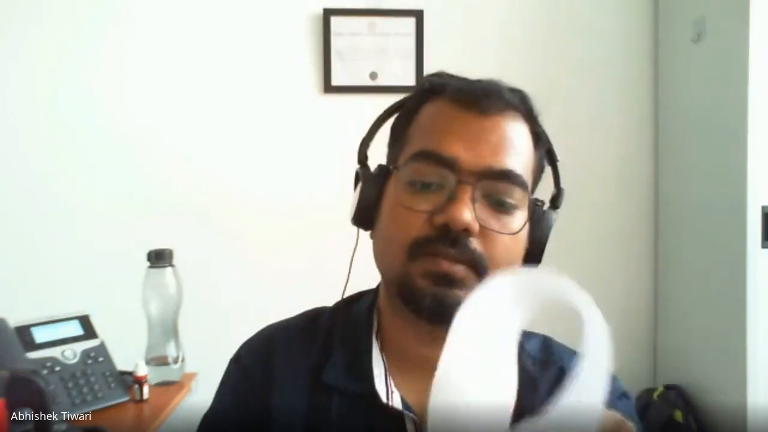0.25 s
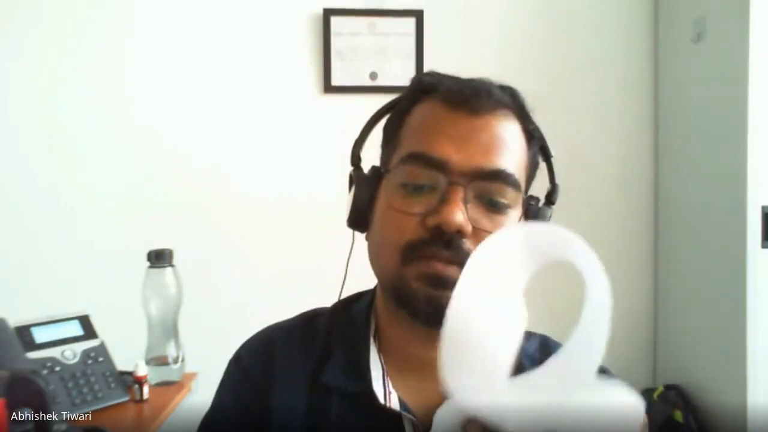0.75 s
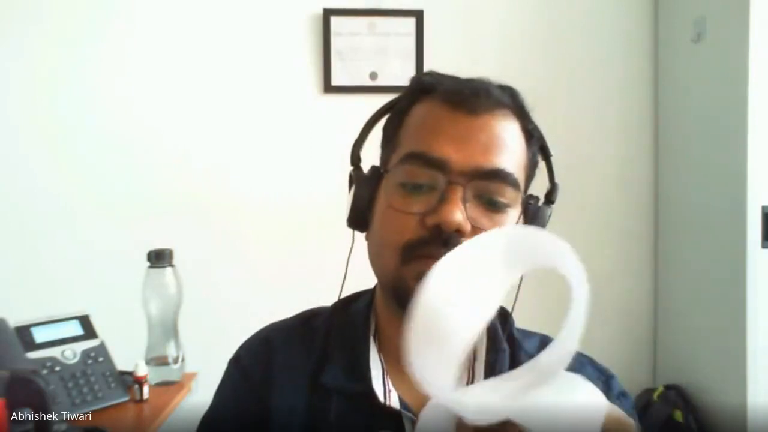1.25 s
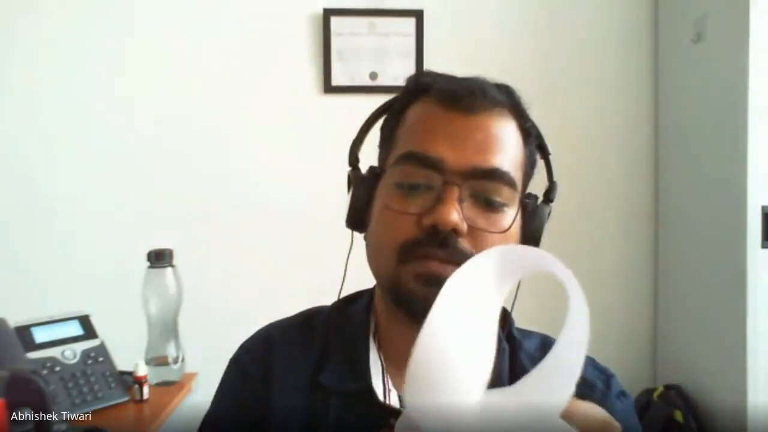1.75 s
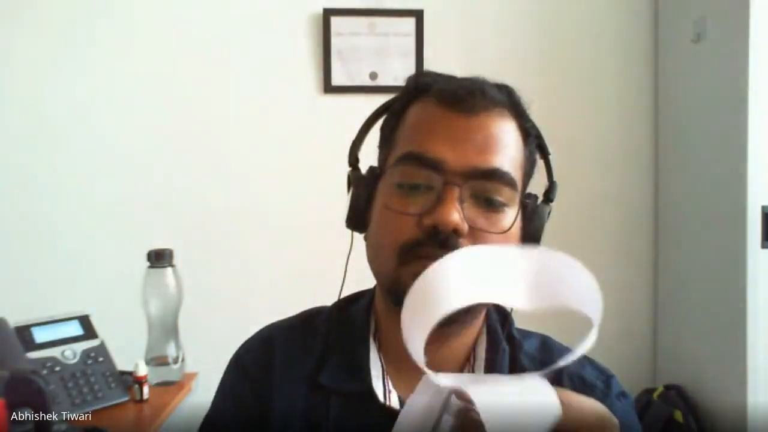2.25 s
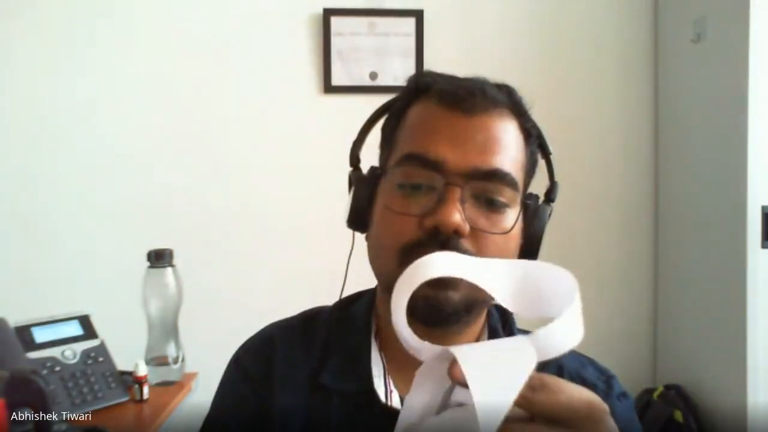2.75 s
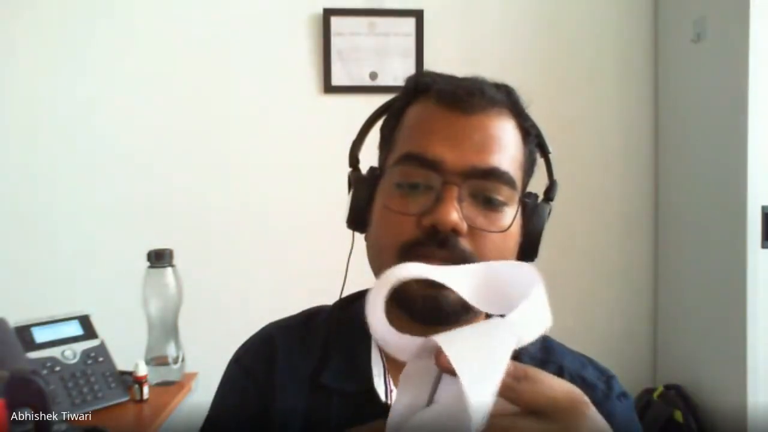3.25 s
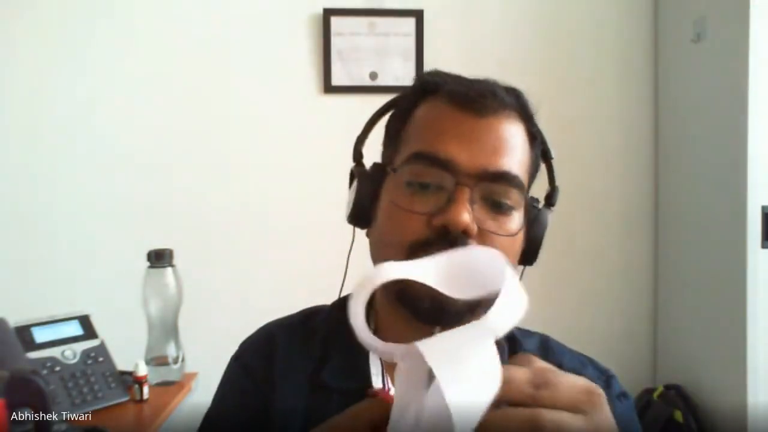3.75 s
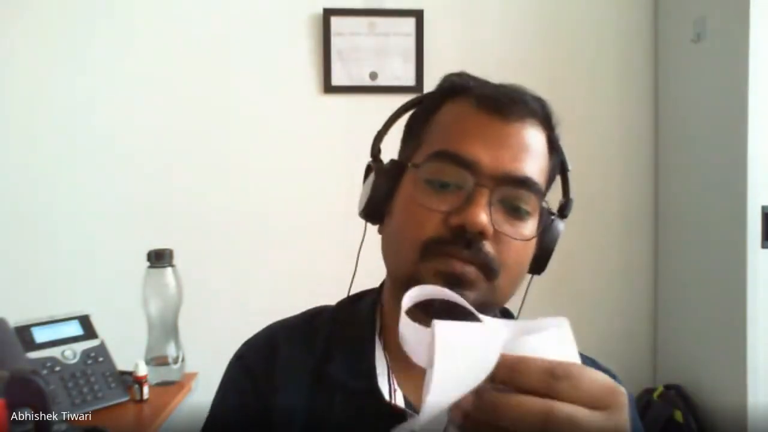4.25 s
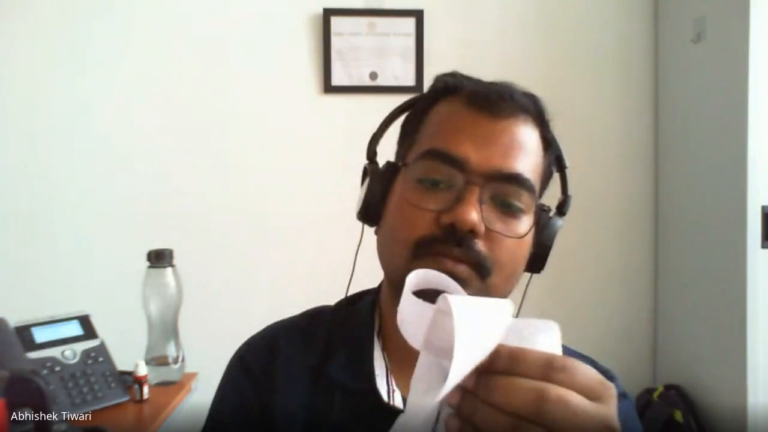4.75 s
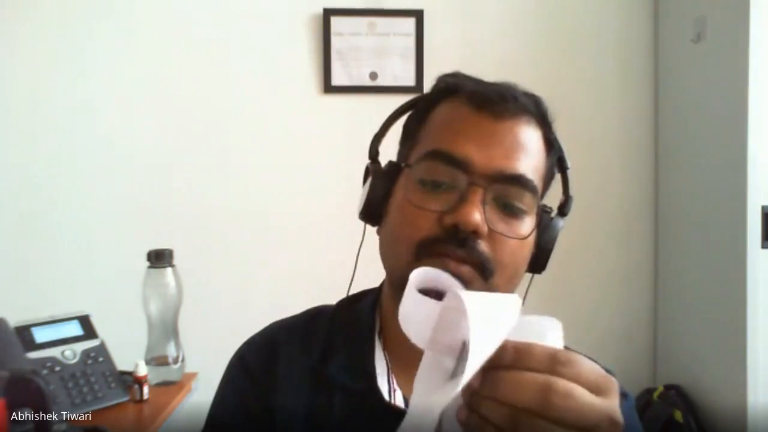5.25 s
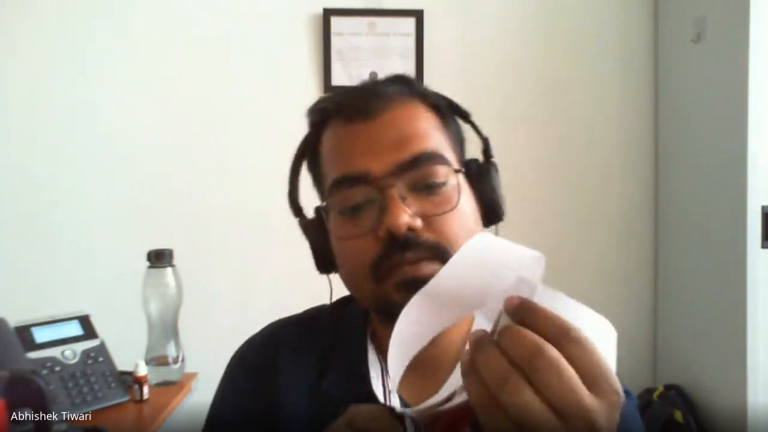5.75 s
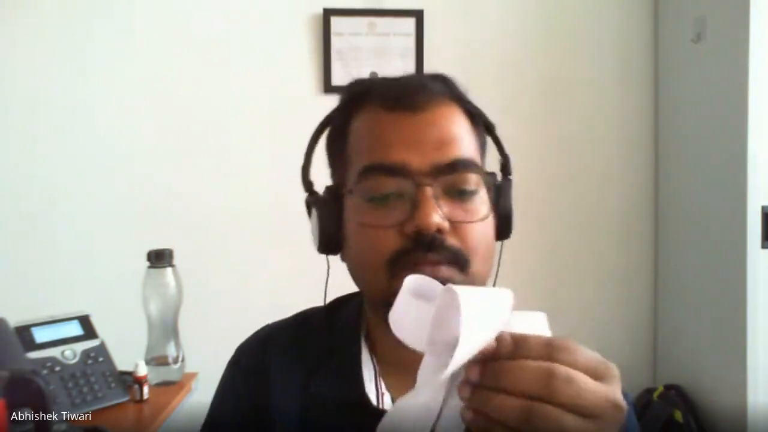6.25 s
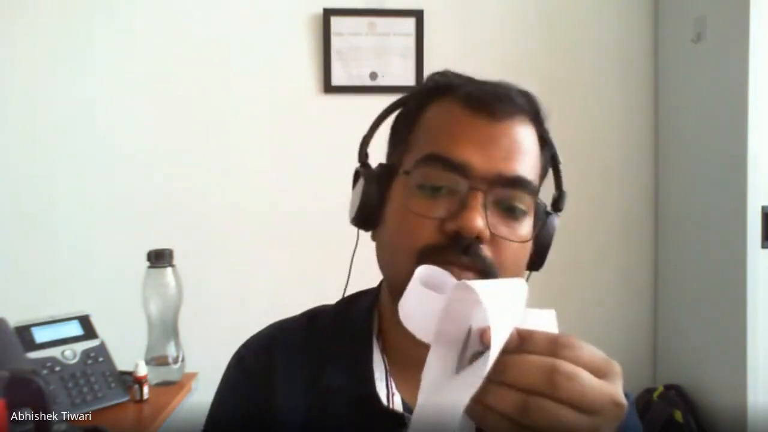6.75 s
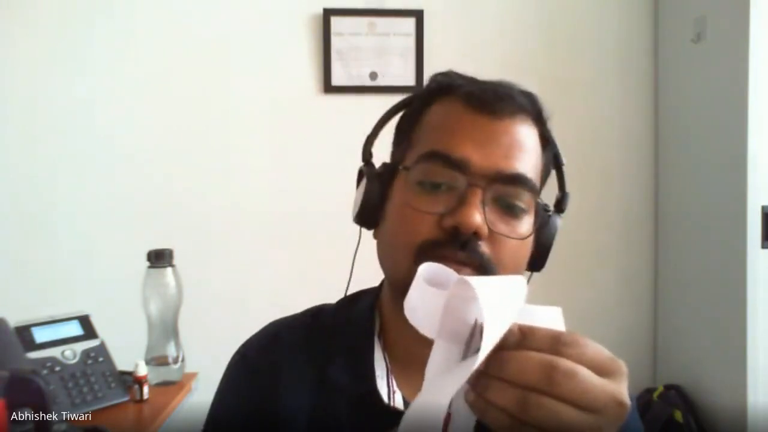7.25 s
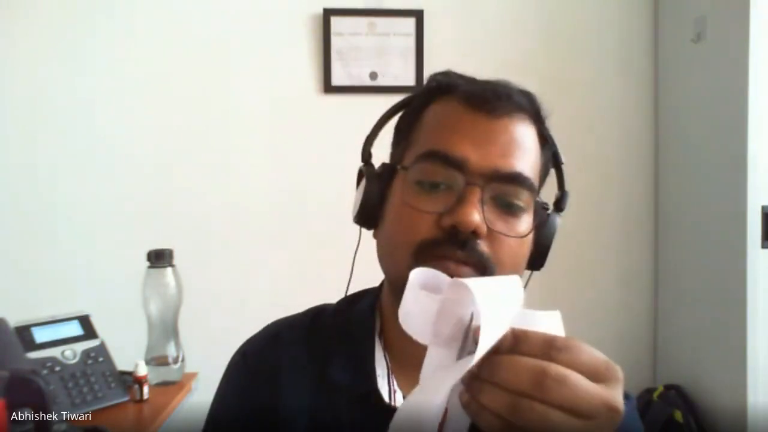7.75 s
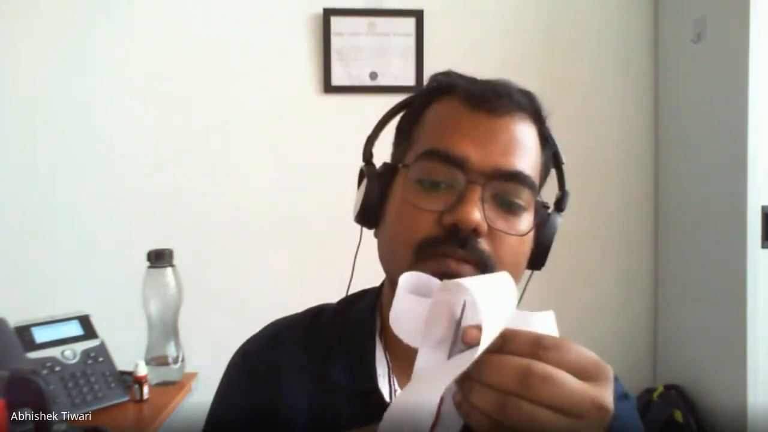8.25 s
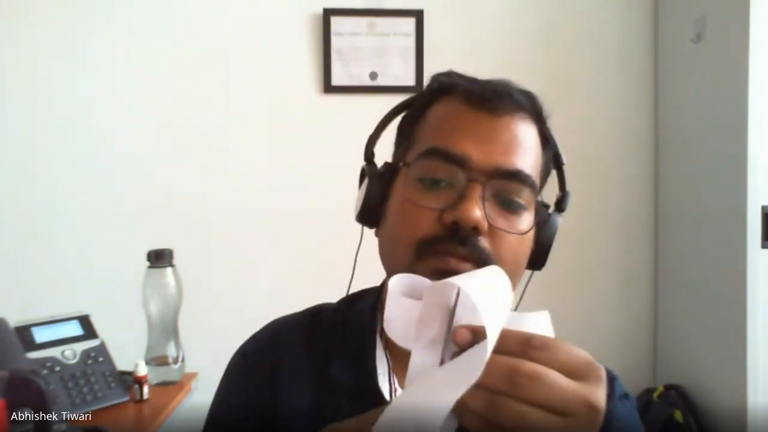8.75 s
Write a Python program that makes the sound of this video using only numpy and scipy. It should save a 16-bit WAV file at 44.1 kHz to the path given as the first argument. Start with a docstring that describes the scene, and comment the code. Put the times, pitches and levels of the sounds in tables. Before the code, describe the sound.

A small bare office, heard through a close computer microphone with faint room air, low rumble, a weak hum and hiss that shifts in steps. Paper brushes through fingers from 0 to 0.6 s. A small tick comes at 1.06 s, then a papery scrape around 1.3 s as the hiss swells until about 1.8 s. It is nearly quiet until a light rustle at 2.6 to 3 s. Crisp snips crack at 3.3 and 3.65 s with short rustles and a brief flutter. After a pause, the loudest cuts come at 5.1 to 5.45 s: sharp clustered snaps, a crunchy stroke and short room ring. Soft brushing follows at 5.6 s, light crackles at 6.3 s, a rustling stroke at 6.75 s and a clear snap at 7.07 s. From 7 s dull low handling thuds mix with faint paper brushing, growing more frequent from 8.2 s to the end.

```python
"""Paper brushes through the fingers at once, over room air with a faint hum and a hiss that changes in steps.
Then scissors work along a stiff paper loop in a small bare office, close to a computer microphone.
Strokes and snaps are fibre clicks, filtered by a paper colour with narrow ringing peaks and shaped in level.
The strip snaps, flutters and now and then sings; handling adds dull thuds of enveloped low noise.
Air, rumble and hiss are coloured noise; the hum is a wavering sine."""
import sys
import numpy as np
from scipy import signal
from scipy.fft import rfft, irfft, next_fast_len
from scipy.io import wavfile
from scipy.ndimage import uniform_filter1d

SR = 44100
rng = np.random.default_rng(int(sys.argv[2]) if len(sys.argv) > 2 else 0)


def store_wav(level_fs):
    """Save 16-bit WAV to argv[1]."""
    pcm = np.round(np.clip(np.atleast_2d(level_fs), -1, 1) * 32767)
    wavfile.write(sys.argv[1], SR, pcm.T.astype(np.int16))


N = 396459  # samples

# Levels of events and air are before the layer's gain_db; colours are relative spectral densities.
# hiss and fizz, held until the next row: t/s, hiss level/dB, fizz level/dB
HISS_STEPS = [(0, -78.5, -86), (.51, -65, -87.5), (1.38, -52.5, -79.5), (1.773, -74.5, -77),
              (2.622, -73.5, -72), (3.87, -69.5, -77), (4.29, -87, -76), (5.8, -82, -82),
              (7.402, -102, -80.5)]
# hiss colour: f/Hz, level/dB
HISS_COLOUR = [(100, -6), (1200, -7), (2600, -3.5), (3400, 3), (4000, 2.5), (4700, -2), (5600, 3),
               (7800, -2.5), (8600, -15.5), (9500, -47)]
# fizz (upper hiss) colour: f/Hz, level/dB
FIZZ_COLOUR = [(2000, -9), (7500, -15), (8300, -1), (9300, -5), (10200, -6.5), (13000, -7.5), (16000, -26)]
# room air, interpolated: t/s, level/dB
AIR_LEVEL = [(0.0, -65.5), (0.42, -69.5), (1.6, -71.5), (1.8, -82), (2.07, -87), (2.85, -73.5), (3.1, -67),
             (3.65, -66), (4.51, -80.5), (5.13, -75), (5.26, -63.5), (6.21, -70), (7.11, -66),
             (7.76, -69.5), (8.64, -68.5), (8.99, -67.5)]
# room air colour: f/Hz, level/dB
AIR_COLOUR = [(30, -11), (65, -6), (135, 2), (260, -2.5), (400, -3), (490, -6.5), (600, -5.5), (750, -8.5),
              (950, -12), (1500, -22.5), (3000, -31.5), (6000, -57.5)]
# deep rumble colour: f/Hz, level/dB
RUMBLE_COLOUR = [(15, -2.0), (45, -3.0), (120, -20.5), (600, -36.5), (3000, -63.5)]
# decay of the room tail: f/Hz, t60/s
ROOM_DECAY = [(200, .6), (1000, 0.65), (4000, 0.37), (9000, 0.31), (15000, 0.68)]
# colour of the walls' answer: f/Hz, gain/dB
WALL_COLOUR = [(500, 12), (2500, 5), (5000, -1.5), (9000, -2.5), (15000, -6.0)]
# handling thuds: centre t/s, level/dB
BUMPS = [(1.08, -63), (2.22, -72), (2.88, -68), (3.3, -63), (3.66, -63), (6.975, -53), (7.055, -55),
         (7.38, -62), (7.6, -53), (7.72, -63), (8.17, -60), (8.245, -54), (8.35, -62), (8.5, -61),
         (8.725, -54), (8.81, -51), (8.9, -58), (8.98, -53)]
# thud colour: f/Hz, level/dB
BUMP_COLOUR = [(50, -30), (90, -8), (125, -1), (150, 0), (195, -1), (260, -15), (450, -27), (800, -46),
               (1500, -70)]
# colour of the whole loop shaking: f/Hz, level/dB
FLAP_COLOUR = [(120, -23.5), (230, -9), (350, 0.5), (490, 0.5), (680, -6), (1000, -23.5), (2500, -60)]
# stick-slip of the strip: centre t/s, resonance f/Hz, level/dB, half length/s
CHAFES = [(.155, 4380, -54, 0.02), (0.493, 3330, -64, 0.018), (1.075, 910, -60.5, 0.012),
          (1.21, 3920, -64.5, .035), (1.331, 1525, -63.5, 0.041), (1.382, 4100, -48.5, 0.018),
          (2.977, 996, -62.5, 0.099), (2.924, 4450, -65, .05), (3.023, 6360, -47, 0.019),
          (3.287, 1030, -43, 0.006), (3.413, 4660, -56.5, 0.012), (3.541, 970, -53.5, 0.01),
          (3.647, 1552, -54, 0.01), (5.21, 2480, -49, .04), (5.391, 4800, -43, 0.0088),
          (6.69, 2810, -55.5, 0.013), (6.776, 1490, -62, 0.012), (6.793, 2370, -52, 0.044),
          (6.93, 2440, -68.5, 0.039), (7.242, 1550, -69.5, 0.019), (7.284, 2720, -60, 0.0076),
          (7.576, 3320, -70.5, 0.013), (7.755, 3260, -69, 0.022), (8.133, 2800, -72, .011),
          (8.431, 6430, -48, 0.0028), (8.588, 3180, -74.5, 0.017)]
# strip through the fingers: top speed t/s, rise/s, fall/s, level/dB, edge re level/dB
SLIDES = [(0.012, 0.11, 0.15, -52, 5), (.086, .04, 0.022, -54, 14), (.156, 0.12, 0.058, -55, 1.5),
          (0.378, 0.084, 0.11, -69, 12), (0.496, 0.037, 0.022, -53.5, -3),
          (0.946, 0.017, 0.088, -50.5, -18), (2.617, .005, 0.13, -59.5, -16),
          (3.277, 0.02, .012, -47.5, -18.5), (3.623, 0.015, 0.027, -55.5, 0),
          (5.076, 0.0043, .035, -70.5, 7.5), (5.55, 0.054, 0.094, -52.5, -6),
          (5.681, 0.15, 0.036, -60.5, 2), (6.25, 0.025, 0.022, -74.5, 9), (6.278, 0.018, 0.015, -51, 3),
          (7.287, .04, 0.065, -55, -1), (7.563, .025, 0.071, -64, 8.5), (7.61, 0.049, 0.034, -60, 8),
          (7.68, 0.013, 0.025, -72, 6), (7.76, 0.051, 0.043, -53.5, 6), (7.989, 0.068, .06, -62, 10),
          (8.13, 0.041, .045, -65.5, 3), (8.19, 0.037, .04, -75.5, 6.5), (8.435, .06, 0.067, -60.5, 11.5),
          (8.574, .03, 0.047, -76, 11), (8.635, 0.1, 0.067, -75.5, 8), (8.888, 0.011, 0.027, -80, 13.5),
          (8.94, .012, 0.071, -65, 4)]
# snaps of blades and buckling paper: t/s, level/dB, body re level/dB, edge re level/dB, crackle t60/s
SNAPS = [(.315, -51.5, -6.5, -0.5, 0.088), (0.497, -55, -17, 8.5, .031), (1.062, -40, -13, -9.5, 0.052),
         (3.016, -45, -16, -3.5, .045), (3.102, -63, 13.5, -0.5, .027), (3.157, -72, 10, 5, .03),
         (3.29, -23.5, -19, -6, .011), (3.529, -48.5, -8, -10.5, .03), (3.546, -51.5, -2, -9.5, 0.034),
         (3.639, -26, -15.5, 2, .0093), (3.849, -53.5, -12, 8, .025), (3.859, -52.5, -20, 0, .04),
         (5.103, -15, -17, -1.5, 0.034), (5.134, -22, -13, -3, .027), (5.325, -23.5, -27, -3.5, .013),
         (5.34, -19, -25, -8.5, 0.021), (5.388, -38.5, -6, -9, .022), (6.271, -61, 1, 13, 0.067),
         (6.443, -63.5, -3.5, 19.5, 0.11), (6.551, -73.5, -5, 21.5, .03), (6.669, -55.5, -15, 10, .037),
         (6.691, -58, 5.5, 11, 0.067), (7.066, -28, -9, -5, 0.03), (8.429, -56, -38, 4.5, .018)]
# cutting strokes, and rustles and flapping of the paper around them:
# full level t/s, rise/s, hold/s, level/dB, body re level/dB, edge re level/dB
CUTS = [(1.202, 0.15, 0.035, -64.5, -9.5, 2.5), (1.313, 0.058, 0.034, -44.5, -16.5, 0.5),
        (2.836, 0.005, .25, -57, -14.5, 1.5), (3.02, .04, 0.036, -44, -6, -3.5),
        (3.335, .02, .085, -51.5, -11.5, -5), (3.664, .01, 0.03, -51, -13, 2),
        (3.717, .02, 0.062, -59.5, -15, -2), (5.164, .02, 0.056, -42, -16, -8),
        (5.247, 0.032, .06, -48.5, -6.5, -15), (5.366, 0.013, .12, -50.5, -17, -2.5),
        (5.446, 0.049, 0.0069, -34, -15.5, -4), (6.687, 0.016, .02, -55, -1, 4),
        (6.75, 0.02, 0.064, -41, -2.5, 0.5), (6.868, 0.016, 0.037, -73, 0, 8.5),
        (7.09, .015, .02, -62.5, -7.5, 5)]
# response of the moving sheet: f/Hz, gain/dB
PAPER_COLOUR = [(150, -32), (350, -20), (750, -16), (1000, -3), (1250, -9), (1550, -1), (2300, 0),
                (3100, -2), (4300, 3), (6500, -1), (9000, 0), (11500, -5), (14200, -13), (16000, -30)]
# response of a snap: f/Hz, gain/dB
CRACK_COLOUR = [(100, -36), (350, -16), (680, -19), (1000, -7), (1280, -12), (1560, -3), (1850, -7),
                (2400, -3), (3100, -8), (4600, -2), (6300, -3), (7700, -7), (10000, -4), (14000, -17),
                (16000, -38)]
# narrow ringing peaks that colour the crackle, before their share: f/Hz, width/Hz, level/dB
RING = [(930, 960, -12.5), (1415, 58, -5), (2170, 14, -15), (3530, 150, -4.5), (4160, 30, -9),
        (5170, 34, 0.5), (6530, 28, -6.5), (6040, 47, -4.5), (7000, 130, -11), (9070, 110, -1),
        (10050, 200, -13)]

HUM_HZ, HUM_RE_AIR_DB = 487, -8.5
BUMP_SIGMA_S = 0.031
FLAP_BODY_SHARE = 0.3  # share of a snap's body level that counts towards the shaking
CHAFE_EDGE = 3  # abruptness of start and stop (2 = bell shaped)
SWING_DB = 21.5  # climb of a stroke in its rise time, drop in its fall time
CUT_RELEASE_S = 0.045  # time to fall by SWING_DB
SLIDE_BODY_DB = -15  # re level: light contact hardly stirs the body of the sheet
TOP_HZ = 16000


def amp(db):
    """Amplitude ratio of a level in dB."""
    return 10 ** (np.asarray(db) / 20)


def unit(x):
    """x at rms 1."""
    return x / np.sqrt(np.mean(x ** 2) + 1e-20)


def along(points, hz):
    """Interpolate (Hz, value) points on a log frequency axis."""
    f, v = np.transpose(points)
    return np.interp(np.log(hz + 1), np.log(f + 1), v)


def filtered(x, response):
    """Apply a response of frequency to x."""
    size = next_fast_len(len(x) + 1024, real=True)
    hz = np.fft.rfftfreq(size, 1 / SR)
    return irfft(rfft(x, size) * response(hz), size)[:len(x)]


def noise(colour):
    """Steady noise of rms 1 with the given spectrum."""
    return unit(filtered(rng.standard_normal(N), lambda hz: amp(along(colour, hz))))


def add(track, start_s, sound):
    """Mix a sound into the track, trimmed to its ends."""
    start = round(start_s * SR)
    sound, start = sound[max(0, -start):], max(0, start)
    track[start:start + len(sound)] += sound[:max(0, N - start)]


def office(x, early_db, tail_db, early_t60_s=0.13):
    """Desk and near walls answer, differently for each place of the hands; the bare room rings on."""
    hz, t, z = signal.stft(rng.standard_normal(SR // 2), SR, nperseg=256)
    decay = amp(-60 * t / along(ROOM_DECAY, hz)[:, None])
    tail = signal.istft(z * decay, SR, nperseg=256)[1]
    age = np.arange(len(tail)) / SR
    early = rng.standard_normal(len(tail)) * amp(-60 * age / early_t60_s)
    answer = amp(early_db) * early / np.linalg.norm(early)
    answer = answer + amp(tail_db) * tail / np.linalg.norm(tail)
    delayed = np.pad(answer, (SR // 250, 0))  # 4 ms
    response = filtered(delayed, lambda hz: amp(along(WALL_COLOUR, hz)))
    response[0] += 1  # direct path
    return signal.fftconvolve(x, response)


def background(air_gain_db=1.28, rumble_db=-82):
    """Room air with a faint wavering hum, a deep rumble, and a hiss that jumps between steady levels."""
    t = np.arange(N) / SR
    waver = unit(filtered(rng.standard_normal(N), lambda hz: 1 / (1 + (hz / 6) ** 2)))
    hum_phase = 2 * np.pi * np.cumsum(HUM_HZ + 2 * waver) / SR  # 2 Hz rms deviation
    hum = np.sqrt(2) * np.sin(hum_phase)
    air_level = amp(np.interp(t, *np.transpose(AIR_LEVEL)) + air_gain_db)
    air = air_level * (noise(AIR_COLOUR) + amp(HUM_RE_AIR_DB) * hum)
    rumble = amp(rumble_db) * noise(RUMBLE_COLOUR)

    step_s, hiss_db, fizz_db = np.transpose(HISS_STEPS)
    step = np.maximum(np.searchsorted(step_s, t, side="right") - 1, 0)

    def held(db):
        """Stepped amplitude, corners smoothed over 300 samples."""
        return uniform_filter1d(amp(db)[step], size=300)

    hiss = held(hiss_db) * noise(HISS_COLOUR)
    fizz = held(fizz_db) * noise(FIZZ_COLOUR)
    return air + rumble + hiss + fizz


def bumps():
    """Hands and forearms give dull, low thuds: low noise under bell-shaped pushes."""
    t = np.arange(N) / SR
    push = sum(amp(db) * np.exp(-0.5 * ((t - s) / BUMP_SIGMA_S) ** 2) for s, db in BUMPS)
    thud = noise(BUMP_COLOUR)
    local_power = np.abs(uniform_filter1d(thud ** 2, size=2200))
    return push * thud / np.sqrt(local_power + 0.2)  # evens out the noise


def flaps(gain_db=-35, rise_s=0.01, t60_s=0.62):
    """Each snap shakes the whole loop, which flutters with a hollow sound that follows the blow."""
    push = np.zeros(N)
    t = np.arange(SR // 2) / SR
    for s, level_db, body_db, _, _ in SNAPS:
        blow_db = level_db + body_db * FLAP_BODY_SHARE + gain_db
        add(push, s, amp(blow_db - 60 * t / t60_s) * (1 - np.exp(-t / rise_s)))
    return push * noise(FLAP_COLOUR)


def fibres(size, rate_hz, spread_db, rub):
    """Tiny fractures of uneven strength at random times, over smooth rubbing."""
    breaks = (rng.random(size) < rate_hz / SR) * rng.choice([-1, 1], size)
    strength = amp(spread_db * np.minimum(rng.standard_normal(size), 2))
    return unit(breaks * strength) + rub * rng.standard_normal(size)


def chafes(quality=14, gain_db=3.0):
    """The strip sticks and slips; the uneven slips make one of its resonances sing out."""
    track = np.zeros(N)
    t = np.arange(-SR // 6, SR // 6) / SR
    for s, pitch_hz, db, half_s in CHAFES:
        def resonance(hz):
            """Two equal resonators in series."""
            detune = hz / pitch_hz - pitch_hz / (hz + 1)
            return 1 / (1 + 1j * quality * detune / 2) ** 2

        slips = fibres(len(t), rate_hz=690, spread_db=2.1, rub=0.24)
        song = unit(filtered(slips, resonance))
        envelope = np.exp(-0.5 * np.abs(t / half_s) ** CHAFE_EDGE)
        add(track, s + t[0], amp(db + gain_db) * song * envelope)
    return track


def ringing(hz, share):
    """Direct sound plus a share of the narrow ringing peaks that colour the crackle."""
    peaks = sum(amp(db) * 1j * hz * width / (centre * centre - hz * hz + 1j * hz * width)
                for centre, width, db in RING)
    return 1 + share * peaks


def flexing(x):
    """As the strip curls, its resonances come and go; the crowded high modes even out."""
    hz, t, z = signal.stft(x, SR, nperseg=512)
    field = rng.standard_normal((len(hz), 100))
    field = uniform_filter1d(field, size=3, axis=0)  # across frequency
    field = unit(uniform_filter1d(field, size=8, axis=1))  # across time
    depth_db = 4.5 / (1 + (hz / 8000) ** 2)
    gain = amp(depth_db[:, None] * field[:, :len(t)])
    return signal.istft(z * gain, SR, nperseg=512)[1][:len(x)]


def registers(x):
    """Split into body (below 2.5 kHz), middle and edge (above 8 kHz)."""
    def below(hz, corner_hz):
        return 1 / (1 + (hz / corner_hz) ** 8)

    body = filtered(x, lambda hz: below(hz, 2500))
    edge = filtered(x, lambda hz: 1 - below(hz, 8000))
    return body, x - body - edge, edge


def stroke(rise_s, hold_s, fall_s, levels_db, curve, rate_hz, spread_db, rub, clump_db, ring):
    """One paper movement: clumped fibre clicks radiated by the curled strip. Returns (lead/s, sound)."""
    t = np.arange(-0.16, 0.4, 1 / SR)
    away = np.maximum(-t / rise_s, 0) + np.maximum((t - hold_s) / fall_s, 0)
    force = amp(-SWING_DB * away ** curve)
    wander = np.interp((t - t[0]) * 200, np.arange(128), rng.standard_normal(128))  # 200 points/s
    clicks = fibres(len(t), rate_hz, spread_db, rub) * amp(clump_db * wander)
    sheet = flexing(filtered(clicks, lambda hz: amp(along(PAPER_COLOUR, hz)) * ringing(hz, ring)))
    balanced = sum(unit(part) * amp(db) for part, db in zip(registers(sheet), levels_db))
    return -t[0], force * balanced


def slides(gain_db=-3.56):
    """Paper brushes over fingers and steel in small crackles that swell and fade with its speed."""
    track = np.zeros(N)
    for s, rise_s, fall_s, db, edge_db in SLIDES:
        levels_db = (db + SLIDE_BODY_DB, db, db + edge_db)
        lead_s, sound = stroke(rise_s, 0, fall_s, levels_db, curve=1.4,
                               rate_hz=1200, spread_db=-6, rub=0.52, clump_db=2.0, ring=0.3)
        add(track, s - lead_s, office(sound, early_db=-19.5, tail_db=-18.5))
    return amp(gain_db) * track


def snaps(crack_t60_s=0.015, crack_db=7, attack_s=0.0011, scrape_db=-13, scrape_s=0.0042, gain_db=-4.0):
    """A very short scrape swells into a sharp crack and a short crackle as the strip settles."""
    track = np.zeros(N)
    t = np.arange(-SR // 50, SR // 8) / SR
    age = np.maximum(t, 0)
    blow = (t >= 0) & (t < 0.007)  # levels are set over this window
    scrape = amp(scrape_db) * np.exp(-np.abs(t) / scrape_s)
    crack = amp(crack_db - 60 * age / crack_t60_s)
    fade = np.minimum((t[-1] - t) / (t[-1] * 0.5), 1)
    for s, level_db, body_db, edge_db, t60_s in SNAPS:
        levels_db = (level_db + body_db, level_db, level_db + edge_db)
        crackle = amp(-60 * age / t60_s)
        release = (crack + crackle) * (1 - np.exp(-age / attack_s))
        burst = (scrape + release) * fade * fibres(len(t), rate_hz=7000, spread_db=1.1, rub=0.77)
        sound = filtered(burst, lambda hz: amp(along(CRACK_COLOUR, hz)) * ringing(hz, 1.2))
        sound = sum(amp(db + gain_db) * part / np.std(part[blow])
                    for part, db in zip(registers(sound), levels_db))
        add(track, s + t[0], office(sound, early_db=-7.5, tail_db=-11))
    return track


def cuts(gain_db=-2.5):
    """Blade strokes, and rustles and flapping of the paper around them: clicks that rise, hold and fall."""
    track = np.zeros(N)
    for s, rise_s, hold_s, db, body_db, edge_db in CUTS:
        levels_db = (db + body_db, db, db + edge_db)
        lead_s, sound = stroke(rise_s, hold_s, CUT_RELEASE_S, levels_db, curve=1.1,
                               rate_hz=1800, spread_db=-0.5, rub=0.79, clump_db=2.35, ring=0.11)
        add(track, s - lead_s, office(sound, early_db=-10.5, tail_db=-15))
    return amp(gain_db) * track


def scene():
    """Scissors and paper over the background."""
    paper = flaps() + chafes() + slides() + snaps() + cuts()
    return (background() + bumps() + paper)[None]


def record(dry):
    """Nothing passes above the band limit."""
    return filtered(dry[0], lambda hz: hz < TOP_HZ)[None]


dry = scene()
out = record(dry)
store_wav(out)
```